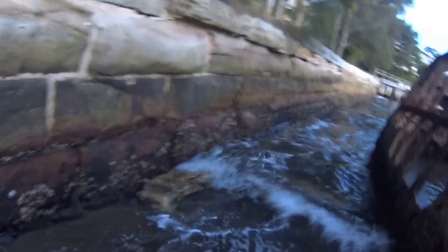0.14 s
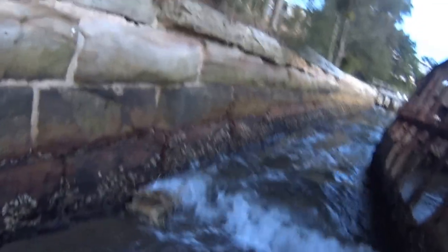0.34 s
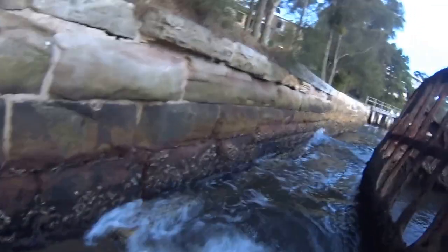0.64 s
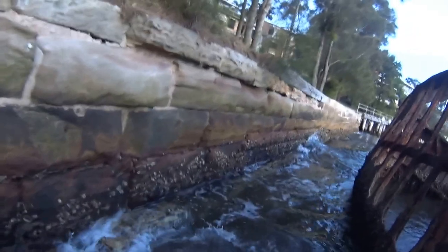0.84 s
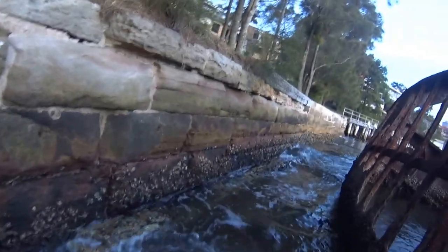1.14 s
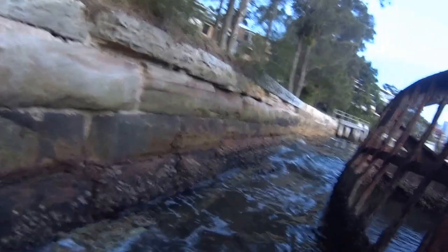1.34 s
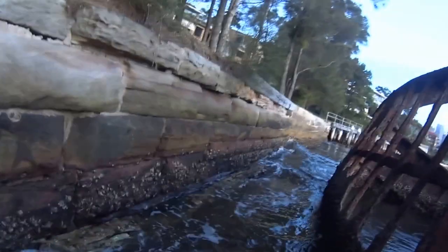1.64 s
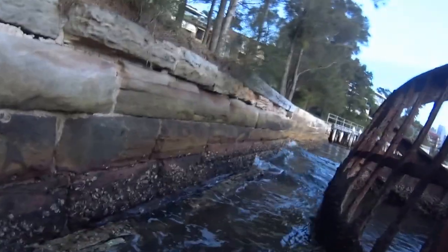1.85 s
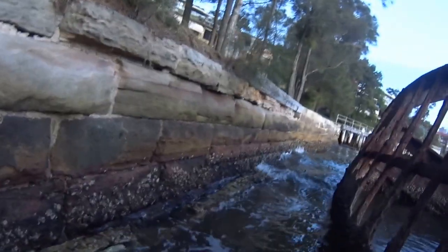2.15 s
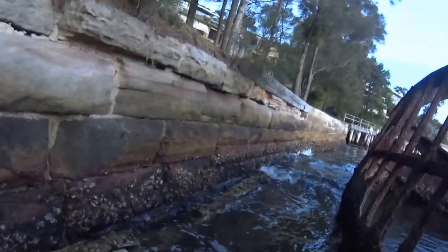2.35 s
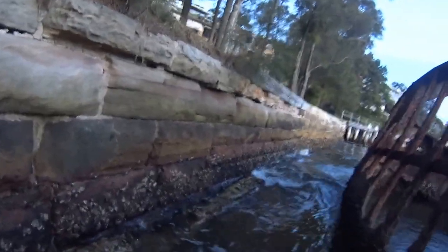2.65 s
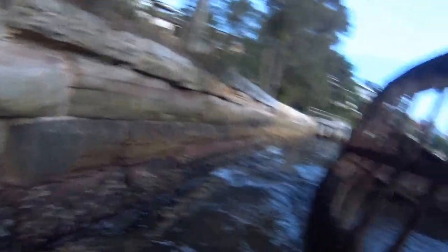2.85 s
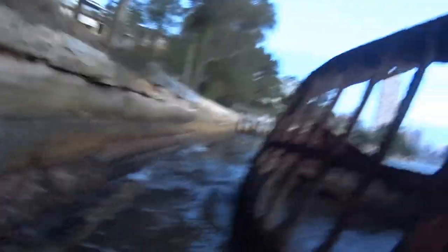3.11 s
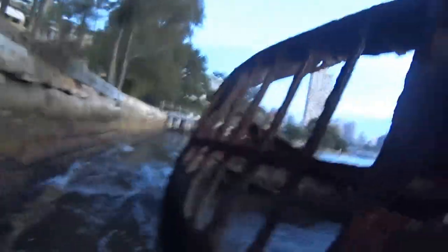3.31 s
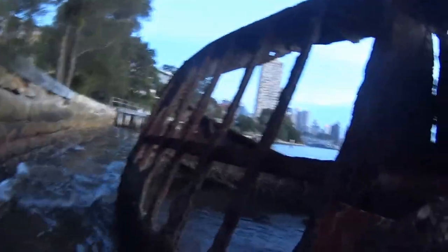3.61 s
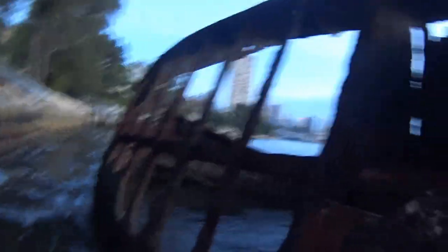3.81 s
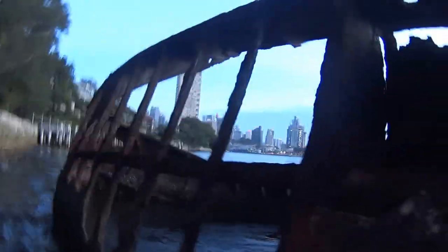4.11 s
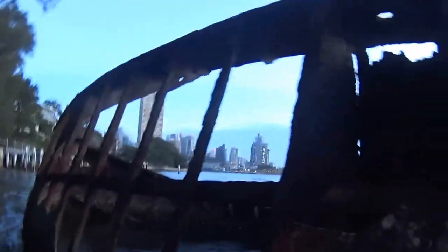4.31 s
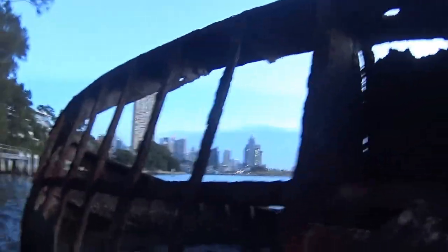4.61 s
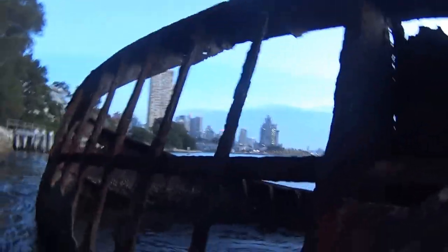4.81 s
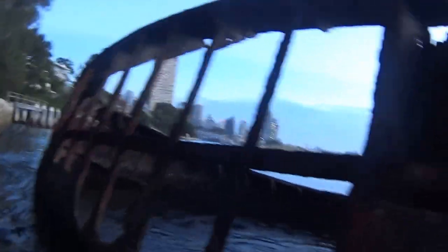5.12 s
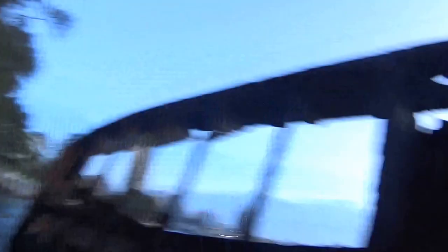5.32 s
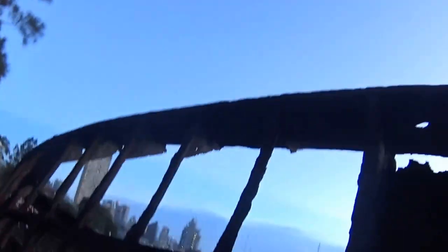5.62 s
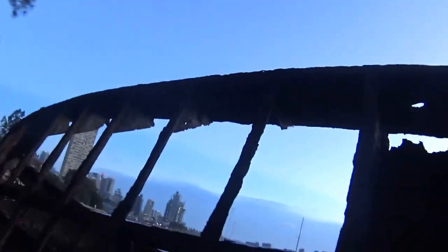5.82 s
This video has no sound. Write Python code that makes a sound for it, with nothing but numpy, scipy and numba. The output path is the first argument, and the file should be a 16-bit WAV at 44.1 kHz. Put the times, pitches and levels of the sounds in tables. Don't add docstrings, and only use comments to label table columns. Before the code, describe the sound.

Boxy, muffled seawater foams and ebbs; from three seconds fingers clatter and scrape on plastic, ending with heavy low thumps and renewed foam.

```python
import sys
import numpy as np
from scipy import signal
from scipy.fft import rfft, irfft, next_fast_len
from scipy.io import wavfile
from scipy.ndimage import uniform_filter1d
from numba import njit

SR = 44100
rng = np.random.default_rng(int(sys.argv[2]) if len(sys.argv) > 2 else 0)


def convert_level_to_amplitude(level_db):
    exponent = np.asarray(level_db, float) / 20
    return 10 ** exponent


def persist_wave(psi):
    counts = np.round(np.clip(psi, -1, 1) * 32767).astype(np.int16)
    wavfile.write(sys.argv[1], SR, np.atleast_2d(counts).T)


N = 262836
T = np.arange(N) / SR

# [t/s, foam level/dB, surge among the stones/dB]
WAVE = [(0.0, -37, -3), (0.3, -34.5, -2), (0.68, -35.5, 2.5), (1.04, -38.5, -1.5), (1.14, -43, -2),
        (1.36, -49, -2.5), (1.61, -50.5, -2.5), (1.99, -47, -1.5), (2.36, -48.5, 2.5), (2.56, -46, -3),
        (2.79, -49.5, 1.5), (3.3, -50, 2.5), (3.78, -46.5, 0.5), (4.1, -46, -1), (4.5, -47, 3),
        (5.4, -37, 5.5), (5.86, -34, 2), (5.96, -38, -1.5)]
# [f/Hz, level/dB]
WATER_COLOUR = [(410, -54), (700, -49), (751, -20), (1120, -0.5), (1500, -1), (1650, -1), (2390, -9),
                (2960, -8.5), (3360, -12.5), (3960, -10), (6040, -8), (7200, -14.5), (10700, -23.5),
                (11100, -22.5), (11500, -96), (15000, -70.5), (22000, -120)]
# [f/Hz, level/dB]
WATER_SIDE = [(60, -1), (340, -10), (690, -1.5), (1050, -8), (1720, -8), (2900, -2), (5000, -9),
              (11600, -3)]
# [f/Hz, phase/rad]
WATER_LEAD = [(780, 0), (1300, .9), (1520, .1), (1850, .2), (2330, 2.6), (3100, 4.3), (4200, 5.6),
              (8800, 6.5)]
# [f/Hz, left minus right level/dB]
WATER_PAN = [(780, 0), (1100, 2), (1330, -4.5), (1550, -3), (2150, 4), (2800, 1), (7000, -1.5), (11600, 1)]
# [f/Hz, level/dB]
SLOSH_COLOUR = [(100, -7), (170, -1.5), (260, -3), (390, -0.5), (520, -2.5), (700, -1.5), (900, 0.5),
                (1500, -62)]
# [start t/s, end t/s, start level/dB, end level/dB, pressure/dB]
RUBS = [(3.017, 3.045, -27, -60, 3), (3.08, 3.112, -49, -21, 5), (3.126, 3.202, -29, -43, 0),
        (3.222, 3.254, -26, -37, -2), (3.249, 3.271, -18, -36, -3.5), (3.277, 3.333, -34.5, -27, -4),
        (3.358, 3.491, -34, -42, 9), (3.515, 3.583, -47, -35.5, -11), (3.638, 3.807, -27, -29.5, -0.5),
        (3.834, 3.851, -43, -29, 5.5), (3.868, 3.974, -26, -30, -9), (3.979, 4.066, -30.5, -34.5, -11),
        (4.293, 4.331, -37.5, -37, 3), (4.525, 4.584, -49, -30, 2), (4.586, 4.693, -29, -30.5, -4.5),
        (4.7, 4.79, -28, -25.5, -0.5), (4.824, 4.873, -26, -25.5, 10), (4.876, 4.902, -32.5, -30, 10),
        (4.92, 5.108, -54.5, -33, 5.5), (5.105, 5.14, -24.5, -31, 0.5), (5.148, 5.251, -34.5, -29.5, 2.5),
        (5.251, 5.316, -28.5, -19, 7.5), (5.354, 5.683, -36.5, -32, 5), (5.686, 5.953, -30.5, -33.5, 5)]
# [f/Hz, width/Hz, level/dB]
CASE_MODES = [(655, 320, -1.5), (1239, 166, 0.5), (1490, 290, -4), (1896, 403, -2.5), (2376, 460, -13.5),
              (2810, 1600, -19), (3476, 1150, -14.5), (5920, 4200, -32.5)]
# [f/Hz, side minus mid level/dB]
CASE_SIDE = [(60, -13), (110, -26), (190, -19), (350, -9.5), (620, 2.5), (1120, -6), (2010, -0.5),
             (3610, 1), (6480, -6), (11600, 5)]
# [t/s, level/dB, f/Hz]
CREAK = [
    (3.285, -37, 1480),
    (3.298, -22, 1494),
    (3.316, -16, 1457),
    (3.319, -32, 1485),
    (3.324, -19.5, 1380),
    (3.334, -20, 1420),
    (3.344, -34, 1470),
]
# [t/s, peak level/dB, f/Hz,
# tilt to the left/dB (0.46 of # it is left minus right level), signed direction of the push]
SLIPS = [(.054, -32, 610, -5, 1), (1.80, -46, 248, 0, 0.88), (1.918, -37, 308, 4, 0.82),
         (2.1, -42, 282, -2, 0.85), (4.301, -49, 303, 6, 0.5), (3.21, -22.5, 600, 1, 0.93),
         (3.015, -33, 655, 12, 0.86), (3.128, -15.5, 436, 2, -0.91), (3.361, -35.5, 600, -20.5, 0.97),
         (3.61, -32.5, 298, 3, -1), (3.636, -21.5, 350, 1, -0.48), (4.078, -25, 590, 7, 0.89),
         (4.812, -11.5, 520, 7.5, 1), (5.106, -27, 600, 6, 0.87), (5.262, -17, 415, 3, 1),
         (5.299, -20, 193, 14, 0.73), (5.3068, -6, 220, 6, 1)]
# [t/s, peak level/dB, ring f/Hz, crack level/dB]
KNOCKS = [(2.974, -27, 1440, -24), (2.99, -8, 1800, -30), (3.015, -21, 1900, -19), (3.097, -9.5, 1300, -16),
          (3.107, -17, 1610, -27), (3.129, -9, 1600, -33), (3.208, -16.5, 1750, -10),
          (3.218, -26, 1880, -17), (3.228, -10.5, 1580, -18.5), (3.249, -17, 1600, -8),
          (3.255, -12.5, 1700, -23), (3.31, -11.5, 1550, -32), (3.361, -15.5, 1670, -16),
          (3.537, -25, 1530, -23), (3.561, -7.5, 1310, -24), (3.578, -22.5, 1550, -34),
          (3.637, -22.5, 1200, -21), (3.769, -15.5, 1490, -20), (3.8, -12.5, 1870, -15.5),
          (3.861, -7.5, 1500, -41), (4.075, -36, 1520, -21), (4.3, -25, 1270, -35), (4.812, -22, 1500, -18),
          (4.905, -20, 1750, -24), (4.971, -18.5, 1650, -35), (5.25, -23, 1760, -15),
          (5.262, -25.5, 1260, -4)]
# [t/s, peak level/dB, ring f/Hz, crack level/dB]
TAPS = [
    (0.054, -12, 1437, -28),
    (1.918, -7.5, 1490, -49),
]
# [t/s, peak level/dB]
TICKS = [
    (1.8, -46),
    (2.226, -38.5),
    (2.5, -44),
    (2.65, -42),
    (2.86, -48),
    (3.438, -36),
    (3.829, -41),
]
# [t/s, level/dB]
GUSTS = [
    [(2.66, -61), (2.8, -52), (3.21, -56), (3.53, -49.5), (3.87, -52), (4.19, -54.5), (4.57, -50.5),
     (4.71, -51), (4.82, -33), (4.94, -37), (4.99, -34), (5.21, -31), (5.6, -30), (5.87, -34.5),
     (5.96, -39)],
]
# [t/s, peak level/dB, f/Hz, cycles to the crest]
THUMPS = [(0.221, -44.5, 165, 3.5), (2.757, -37.5, 110, 0.24), (2.812, -52, 50, 0.28),
          (1.915, -45, 70.4, 0.53), (3.132, -15, 61, 0.15), (3.229, -39, 70, 0.21),
          (3.611, -33, 62.4, 0.26), (4.789, -33, 44.6, 0.31), (4.814, -30, 40.7, 0.44),
          (4.907, -14, 33, 0.42), (5.007, -18.5, 36.4, 0.27), (5.051, -19.5, 44.7, 0.38),
          (5.11, -22, 40, 0.41), (5.249, -14, 30, 0.73), (5.282, -10, 60, 0.59), (5.312, -2.5, 68, 0.49),
          (5.492, -3, 71, 0.42), (5.713, -16.5, 42.3, 0.64)]


def water():
    foam_db, surge_db = columns(WAVE)
    over_crest_db = foam_db + 35
    lap_db = -38.5 + 0.68 * over_crest_db + 0.46 * surge_db
    slosh_db = -43 + surge_db + 0.78 * over_crest_db
    swell_db = 0.8 * walk(14)
    pair = []
    for _ in range(2):
        popping = bubbles(count=12000, lo_hz=2735, hi_hz=10070, cycles=3.85, scatter_db=3.5, glide=0.182)
        lapping = bubbles(count=2500, lo_hz=970, hi_hz=2300, cycles=3.73, scatter_db=2.5, glide=0.177)
        pockets = bubbles(count=500, lo_hz=200.2, hi_hz=600, cycles=4.16, scatter_db=3.5, glide=0.236)
        fizz = noise() + convert_level_to_amplitude(-5) * band(popping, 3860, 8300)
        lap = noise() + convert_level_to_amplitude(-13.0) * lapping
        slosh = noise() + convert_level_to_amplitude(-14) * pockets

        high = unit(band(tint(fizz, WATER_COLOUR), 2130, 16700))
        middle = unit(band(tint(lap, WATER_COLOUR), 750, 2500))
        middle = unit(middle + convert_level_to_amplitude(8) * band(middle, 1450, 1530, order=1))
        low = unit(tint(band(slosh, 130, 2300), SLOSH_COLOUR))

        ripples = convert_level_to_amplitude(-55.5 + 0.53 * walk(51)) * unit(band(fizz, 2000, 4220))
        foam = convert_level_to_amplitude(foam_db + 2.0 + swell_db + 1.0 * walk(30)) * high
        laps = convert_level_to_amplitude(lap_db + 2.0 + swell_db + 1.4 * walk(25.53)) * middle
        sloshes = convert_level_to_amplitude(slosh_db - 1.5 + 1.1 * walk(19)) * low
        pair.append(ripples + foam + laps + sloshes)
    return convert_level_to_amplitude(1.5) * facing(*pair)


def bubbles(count, lo_hz, hi_hz, cycles, scatter_db, glide):
    when, pitch, chance = rng.random((count, 3)).T
    start = (when * N).astype(np.int64)
    hz = lo_hz * (hi_hz / lo_hz) ** pitch
    size = convert_level_to_amplitude(-scatter_db * np.log(1.01 - chance))
    return unit(rings(start, hz, np.full(count, 1. * cycles), size, glide, N))


def facing(mid, other):
    size = next_fast_len(N)
    lead = spread(WATER_LEAD, size)
    pan_db = spread(WATER_PAN, size)
    diff = tint(other, WATER_SIDE)
    out = []
    for way in (1, -1):
        turn = np.exp(.5j * way * lead) * convert_level_to_amplitude(way * pan_db / 2)
        out.append(irfft(rfft(mid + way * diff, size) * turn, size)[:N])
    return np.array(out)


def rubbing():
    slips = []
    for _ in range(2):
        size = convert_level_to_amplitude(-2.0 * np.log(1.01 - rng.random(N)))
        slips.append(noise() * size * (rng.random(N) < .3))
    slips = np.array(slips)
    grip = convert_level_to_amplitude(1.3 * walk(90))
    ring = case(slips, -68, -60, wander_db=2.55)
    upper = band(ring, 1690, 2035)
    top = band(case(slips, 0, -62, wander_db=2.5), 2450, 4270)
    top = top + convert_level_to_amplitude(-20) * np.std(ring) * unit(band(slips, 5330, 6420))
    body = convert_level_to_amplitude(-12.5) * unit(band(slips, 178, 1130))

    ring_gain, upper_gain, top_gain, body_gain = np.zeros((4, N))
    for start, end, start_db, end_db, pressure_db in RUBS:
        times = [start - .004, start, end, end + .005]
        db = np.interp(T, times, [start_db - 12, start_db, end_db, end_db - 12], -120, -120)
        top_db = db + 4.06 - 0.22 * (db + 30) - 0.38 * max(pressure_db, 0)
        ring_gain = ring_gain + convert_level_to_amplitude(db)
        upper_gain = upper_gain + convert_level_to_amplitude(db - 9 - .4 * pressure_db)
        top_gain = top_gain + convert_level_to_amplitude(top_db)
        body_gain = body_gain + convert_level_to_amplitude(db + pressure_db)
    shell = (ring_gain * ring + upper_gain * upper + top_gain * top) / np.std(ring)
    mid, other = grip * (shell + body_gain * body)

    creak_db, creak_hz = columns(CREAK)
    creak = convert_level_to_amplitude(creak_db + 1.5 * walk(130)) * np.sin(2 * np.pi * np.cumsum(creak_hz) / SR)
    return ports(mid + creak, other, CASE_SIDE, alike=0.41)


def case(x, bright_db=0, body_db=0, wander_db=0):
    out = 0
    for k, (hz, width, db) in enumerate(CASE_MODES):
        trim_db = bright_db if k > 4 else body_db if k == 0 else 0
        touch_db = wander_db * walk(18) if wander_db else 0
        b, a = signal.iirpeak(hz, hz / width, SR)
        mode = signal.lfilter(b, a, signal.lfilter(b, a, x))
        out = out + (-1) ** k * convert_level_to_amplitude(db + trim_db + touch_db) * mode
    return out


def ports(mid, other, side, alike):
    alike = np.clip(alike, 0, 1)
    diff = alike * tint(mid, side, 1j) + np.sqrt(1 - alike ** 2) * tint(other, side)
    return np.array([mid + diff, mid - diff])


def sticking():
    s, db, hz, pan_db, way = np.transpose(list(SLIPS) + judder_slips())
    out = []
    for lag_s, side in ((0, -0.24), (.0007, -0.7)):
        start = ((s + lag_s) * SR).astype(np.int64)
        size = way * convert_level_to_amplitude(db + 8.0 + side * pan_db)
        pulse = rings(start, hz, np.full(len(s), .9), size, 0., N)
        out.append(pulse + convert_level_to_amplitude(16.5) * case(pulse, -1, -30))
    return np.array(out)


def judder_slips():
    count = 8
    gaps_s = np.interp(np.linspace(0, 1, count - 1), [0, .5, 1], (.0115, .0052, .0082))
    times = 5.6162 + np.append(0, np.cumsum(gaps_s))
    dips = np.interp(np.linspace(0, 1, count), [0, .14, .58, .75], [0, 1, .8, 0])
    return [(s, -7.5 - 5 * dip, 564, 11, -1) for s, dip in zip(times, dips)]


def knocks():
    length = 4096
    out = np.zeros((2, N + length))
    t = T[:length]
    pan_db = np.array([[1.5], [-1.5]]) / 2
    hits = list(TAPS) + list(KNOCKS) + [(s, db, 1500, -1) for s, db in TICKS]
    for s, db, hz, crack_db in hits:
        t60_s = 0.014 * convert_level_to_amplitude(-.3 * (db + 21))
        ring = -np.sin(2 * np.pi * hz * t) * convert_level_to_amplitude(-60 * t / t60_s) * (1 - np.exp(-t / 0.00068))
        u, v = rng.standard_normal((2, length))
        burst = (u + .6 * np.array([v, -v])) * np.exp(-t / .0024)
        tail = case(burst, -1.8, -9.5)
        crack = band(burst, 2400, 5800) + convert_level_to_amplitude(7) * band(burst, 3100, 3400, order=1)
        hit = ring / ring.max()
        hit = hit + convert_level_to_amplitude(0.29 * crack_db + 6.5) * tail / np.abs(tail).max()
        hit = hit + convert_level_to_amplitude(crack_db + 15.0) * crack / np.abs(crack).max()
        i = int((s - .0006) * SR)
        out[:, i:i + length] += convert_level_to_amplitude(db + pan_db) * hit
    return out[:, :N]


def rumble():
    gust = sum(convert_level_to_amplitude(columns(g)[0] + 2.0 + 2.4 * walk(24)) for g in GUSTS)
    pair = []
    for _ in range(2):
        wind = gust * unit(band(noise(), 9.9, 94, order=3))
        harbour = convert_level_to_amplitude(-55) * unit(band(band(noise(), 19.5, 38.0, order=1), 11, 190))
        pair.append(wind + harbour)
    mid, other = pair
    for s, db, hz, crest in THUMPS:
        i = int(s * SR)
        turns = T[:N - i][:SR // 2] * hz
        swell = turns / crest * np.exp(1 - turns / crest)
        mid[i:i + SR // 2] += convert_level_to_amplitude(db) * swell * np.sin(2 * np.pi * turns / (1 + 0.09 * turns))
    return mid * convert_level_to_amplitude(np.array([[1.6], [-1.6]])) + convert_level_to_amplitude(-20) * other * np.array([[1], [-1]])


@njit
def rings(start, hz, cycles, size, glide, length):
    out = np.zeros(length)
    for k in range(len(start)):
        a, f, p, i = size[k], hz[k] / SR, 0., start[k]
        while abs(a) > .002 * abs(size[k]) and i < length and f < .45:
            out[i] += a * np.sin(2 * np.pi * p)
            p += f
            a *= 1 - f / cycles[k]
            f *= 1 + glide * f / cycles[k]
            i += 1
    return out


def unit(x):
    return x / np.sqrt(np.mean(x ** 2))


def noise():
    return rng.standard_normal(N)


def band(x, lo_hz, hi_hz, order=2):
    return signal.sosfilt(signal.butter(order, [lo_hz, hi_hz], "band", fs=SR, output="sos"), x)


def spread(table, size):
    hz, value = np.transpose(table)
    bins = np.log(np.arange(1, size // 2 + 2) * SR / size)
    return np.interp(bins, np.log(hz), value)


def tint(x, table, turn=1):
    size = next_fast_len(N)
    return irfft(rfft(x, size) * turn * convert_level_to_amplitude(spread(table, size)), size)[:N]


def walk(rate):
    k = int(SR / rate)
    steps = np.repeat(rng.standard_normal(N // k + 1), k)
    return 1.43 * uniform_filter1d(uniform_filter1d(steps, k), k)[:N]


def columns(table):
    s, first, *rest = np.transpose(table)
    return [np.interp(T, s, first, -120, -120)] + [np.interp(T, s, c) for c in rest]


def scene():
    return water() + rubbing() + sticking() + knocks() + rumble()


def band_limit(x):
    return signal.sosfilt(signal.butter(12, 12230, fs=SR, output="sos"), x)


def record(dry):
    soft = np.tanh(1.037 * dry) / 1.133
    top_cut = signal.ellip(8, .2, 60, 10950, fs=SR, output="sos")
    return band_limit(signal.sosfilt(top_cut, soft))


dry = scene()
out = record(dry)
persist_wave(out)
```